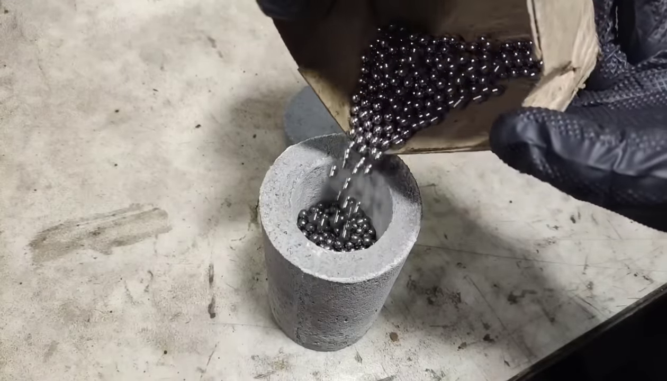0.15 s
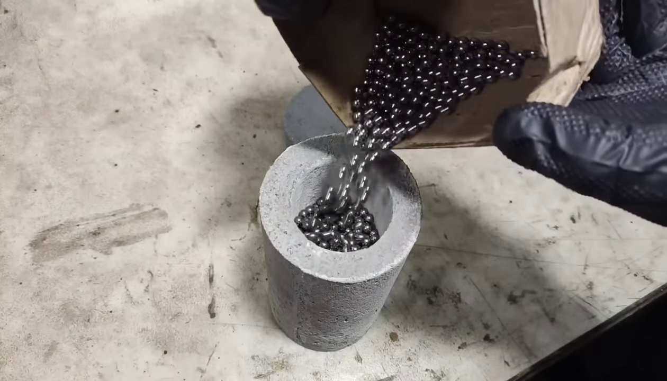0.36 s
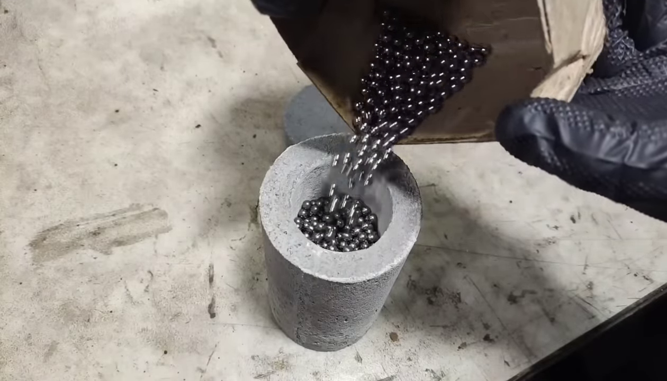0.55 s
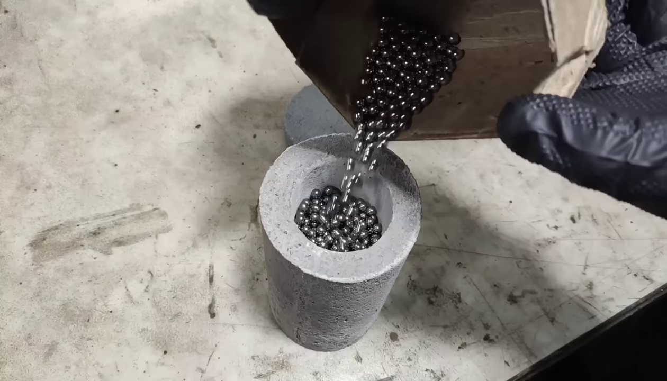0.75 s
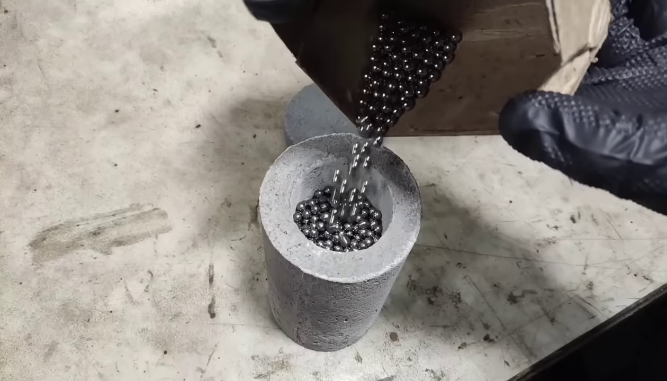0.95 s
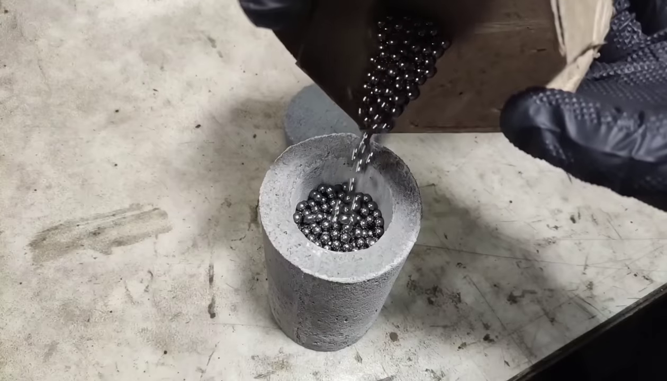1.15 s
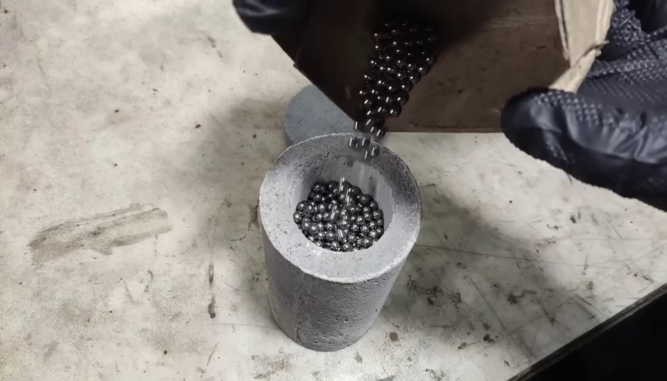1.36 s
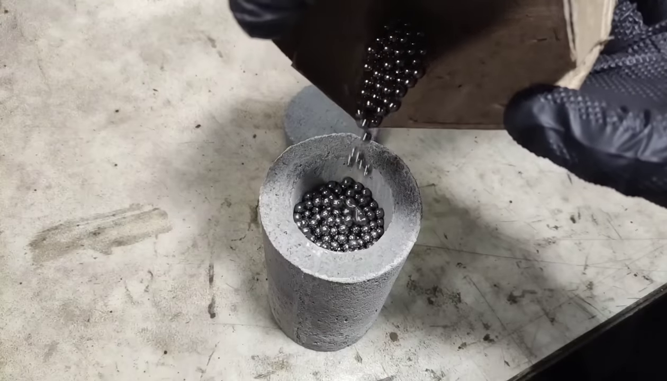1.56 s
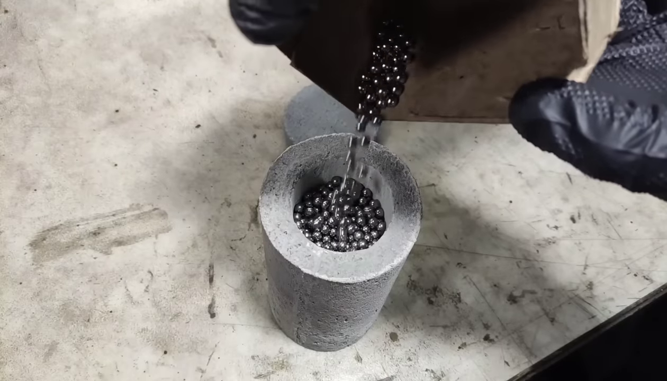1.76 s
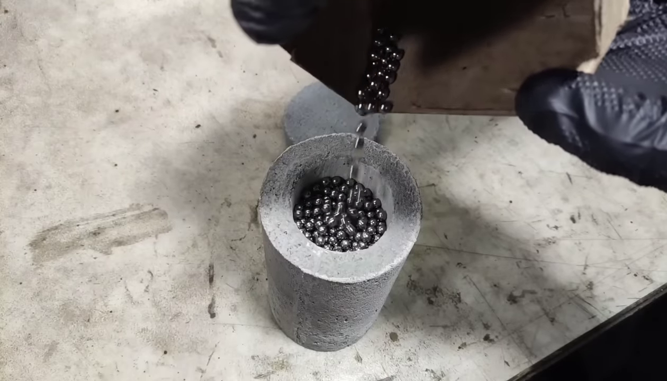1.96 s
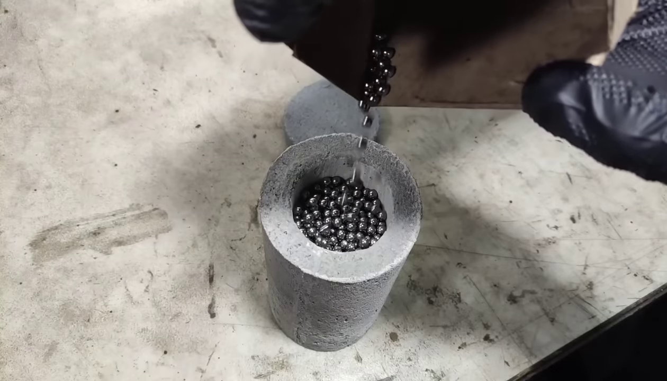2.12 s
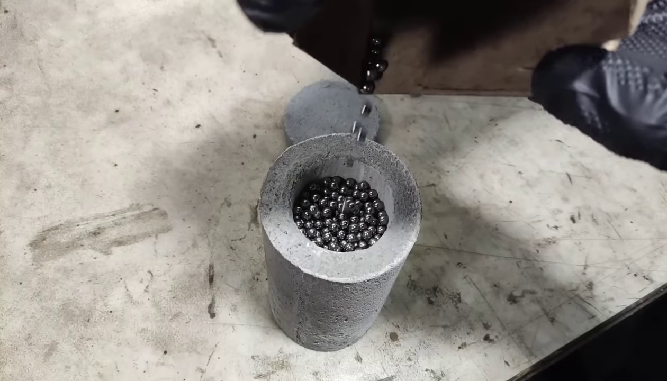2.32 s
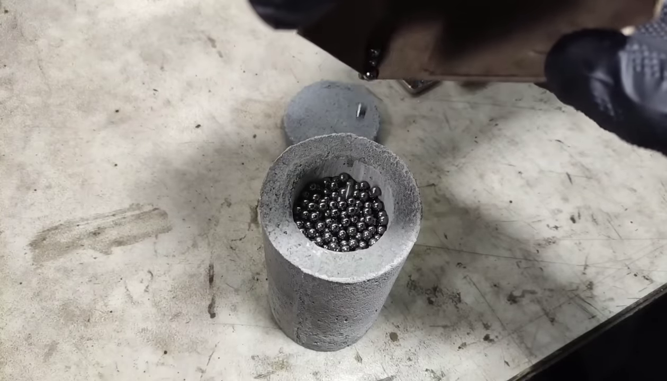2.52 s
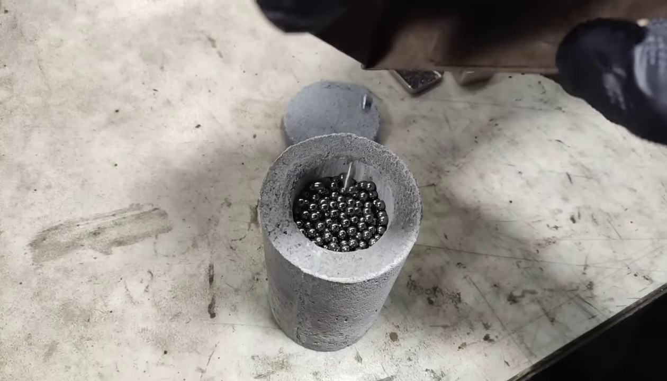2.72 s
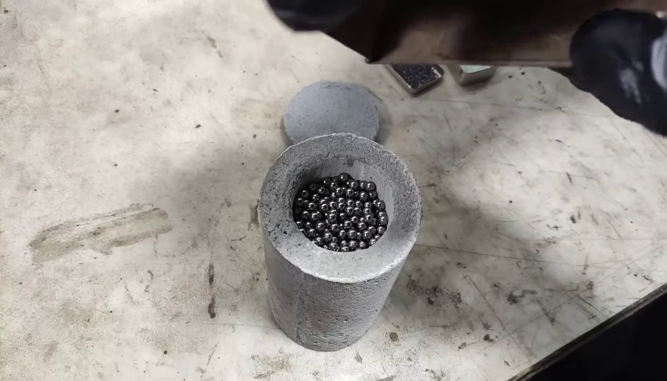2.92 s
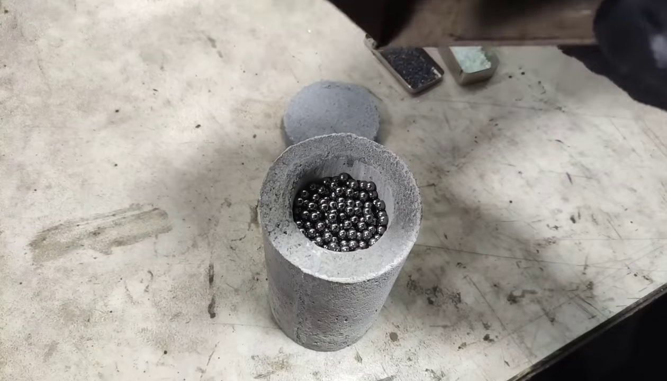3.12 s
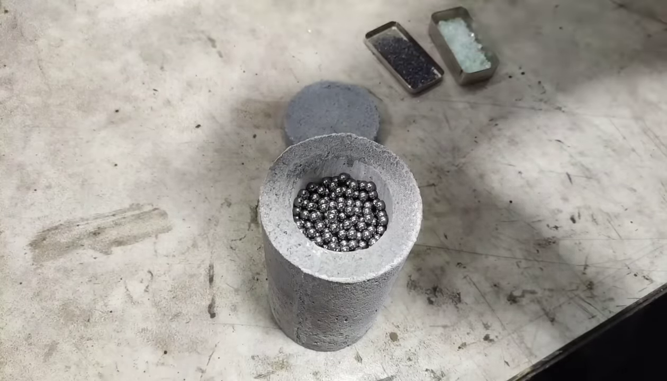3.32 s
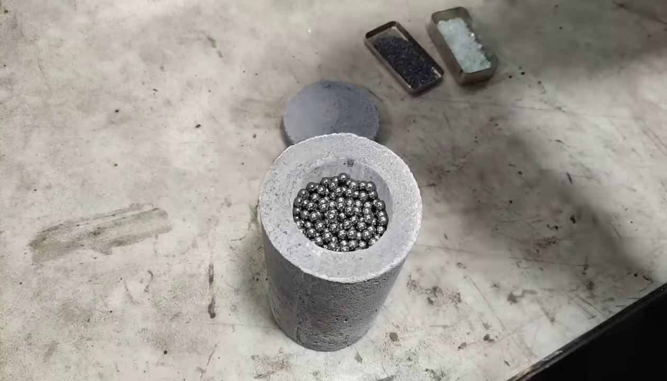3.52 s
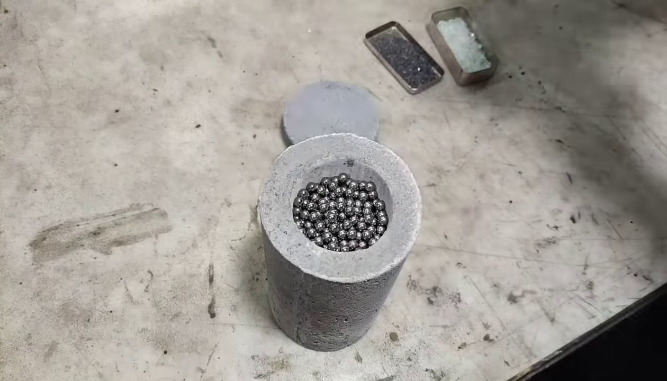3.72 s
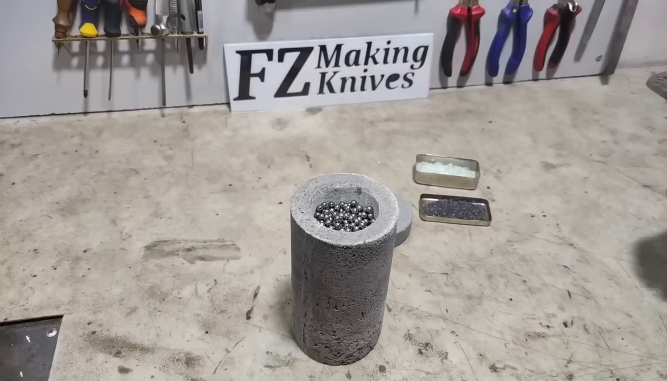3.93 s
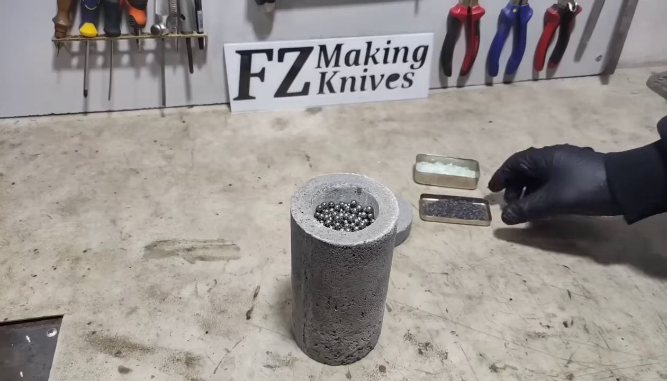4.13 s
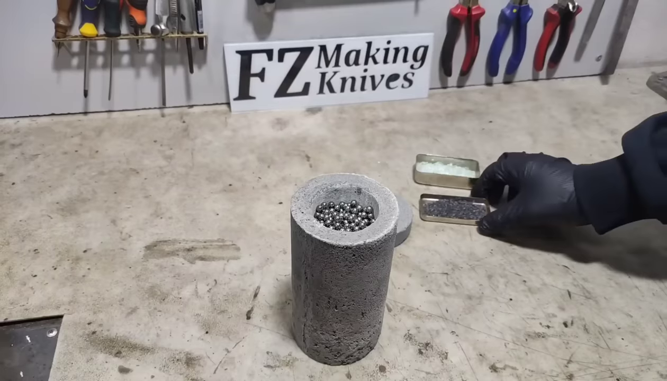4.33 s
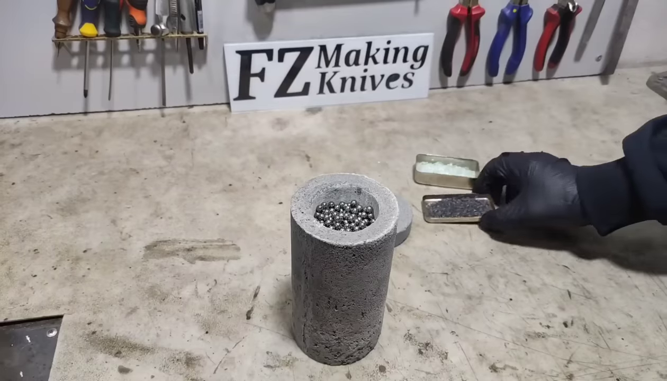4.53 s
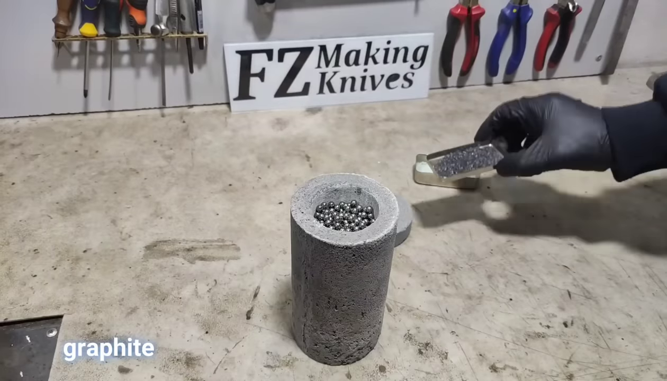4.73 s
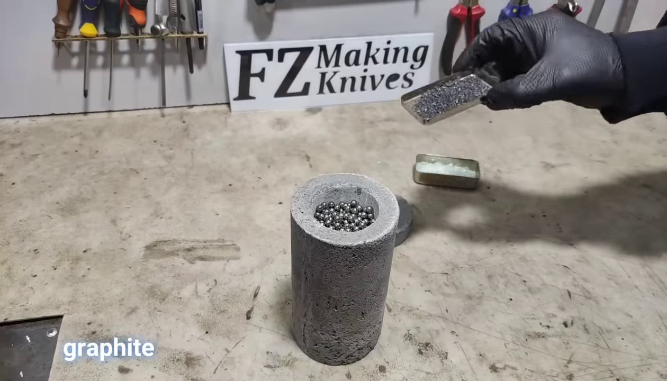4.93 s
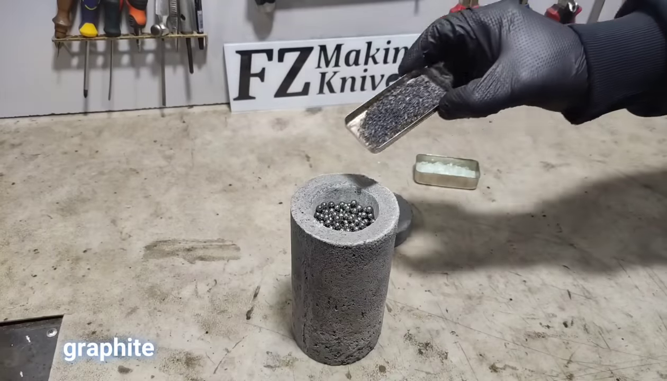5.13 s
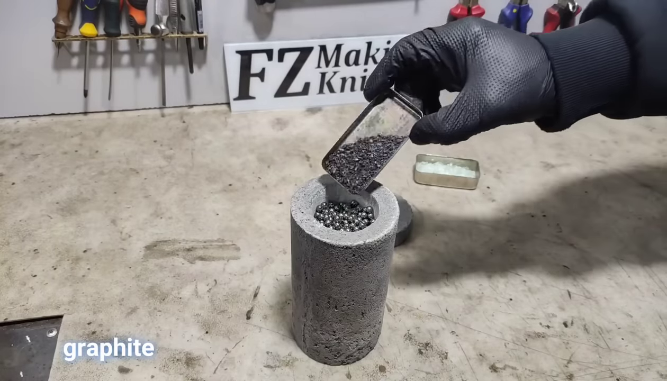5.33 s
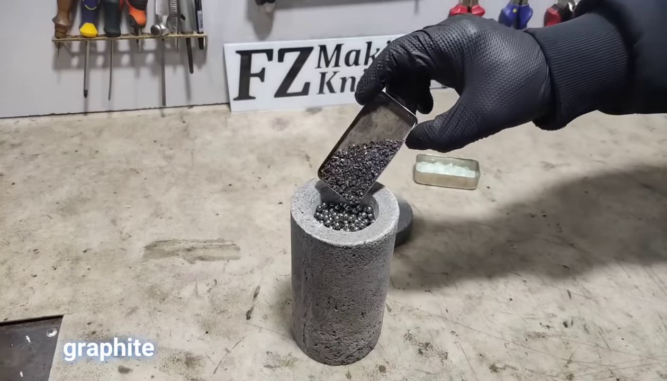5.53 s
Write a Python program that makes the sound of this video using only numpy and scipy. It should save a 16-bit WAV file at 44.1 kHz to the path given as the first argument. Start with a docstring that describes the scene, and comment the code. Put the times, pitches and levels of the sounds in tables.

```python
"""Small steel balls pour from a cardboard box into a thick crucible on a workbench, heard close up in stereo.
From the start, noise bursts through resonances click brightly on the heap; damped sines knock dully on the
box and the crucible, the bench booms and a small workshop echoes, over noisy rumble and hiss and a thin ring.
The dense stream thins to single balls, and the last one lands at three seconds. Then bands of soft noise rub
as the box is put away and a tin of graphite grains is lifted; a low sine swells and the grains hiss."""
import sys
import numpy as np
from scipy import signal
from scipy.fft import rfft, irfft, next_fast_len
from scipy.io import wavfile
from scipy.ndimage import uniform_filter1d

SR = 44100
rng = np.random.default_rng(int(sys.argv[2]) if len(sys.argv) > 2 else 0)


def file_out(sig):
    """Save sig as 16-bit WAV at sys.argv[1]."""
    # one column per channel
    cols = np.atleast_2d(sig).T
    # limit, then scale
    lim = np.clip(cols, -1, 1)
    pcm = np.round(lim * 32767).astype(np.int16)
    wavfile.write(sys.argv[1], SR, pcm)


N = 250047

# The tilt of the box sets the flow. Each row: time in seconds, flow in balls a second.
POUR_FLOW = [(0, 118.6), (.85, 137.5), (1.08, 81.7), (1.35, 61), (1.62, 42), (2.03, 58), (2.25, 15),
             (2.6, 6.93)]
# Balls that land hard or alone on the heap. Each row: landing in seconds, relative level in dB.
HARD_LANDINGS = [(0.0218, -26), (0.2902, -23), (0.3626, -23.5), (0.6624, -25.5), (1.2231, -27.5),
                 (1.264, -29.5), (1.3495, -30), (1.5224, -29.5), (1.5673, -31.5), (1.624, -27.5),
                 (1.719, -31.5), (1.8031, -30.5), (1.9888, -27.5), (2.1104, -29), (2.1233, -27.5),
                 (2.1524, -29), (2.1771, -29), (2.1993, -32), (2.2355, -35), (2.2765, -27.5),
                 (2.3013, -28.5), (2.3339, -31.5), (2.355, -32.5), (2.3826, -35.5), (2.4145, -33),
                 (2.4338, -29.5), (2.4542, -33), (2.481, -36), (2.4931, -35), (2.5317, -34), (2.585, -30),
                 (2.611, -30.5), (2.6845, -25.5), (2.7383, -32), (2.794, -34.5), (2.872, -32.5),
                 (2.9369, -31.5), (2.9553, -31.5), (3.0023, -32)]
FULL_FLOW = 147  # balls a second; a thinner stream stirs the heap less


def amp(db):
    """Turn decibels into gain."""
    return 10 ** (np.asarray(db) / 20)


def unit(x):
    """Scale to rms 1."""
    return x / np.sqrt(np.mean(x ** 2) + 1e-20)


def along(points, hz):
    """Read a curve of (Hz, value) points on a log frequency axis."""
    point_hz, values = np.transpose(points)
    return np.interp(np.log(hz + 1), np.log(point_hz + 1), values)


def flow_at(s):
    """Balls a second that pour at time s."""
    return np.interp(s, *np.transpose(POUR_FLOW))


def filtered(x, response):
    """Filter x with a complex response given as a function of frequency."""
    size = 2 * next_fast_len((N + SR // 2) // 2)  # half a second of room for ringing
    hz = np.fft.rfftfreq(size, 1 / SR)
    return irfft(rfft(x, size) * response(hz), size)[..., :N]


def causal(gain):
    """Give a gain curve the minimum phase, so that it rings only after a blow."""
    cepstrum = irfft(np.log(np.maximum(gain, 1e-6)))
    half = cepstrum.shape[-1] // 2
    cepstrum[..., 1:half] *= 2
    cepstrum[..., half + 1:] = 0
    return np.exp(rfft(cepstrum))


def resonance(hz, centre, width):
    """Power response of one damped mode, 1 at its centre."""
    damping = (hz * width) ** 2
    return damping / ((centre ** 2 - hz ** 2) ** 2 + damping)


def band(centre_hz, width_hz):
    """Stereo noise of rms 1 shaped by one resonance with steep skirts."""
    noise = rng.standard_normal((2, N))
    return unit(filtered(noise, lambda hz: resonance(hz, centre_hz, width_hz)))


def add(track, s, sound):
    """Mix a sound into a track at time s."""
    start = max(round(s * SR), 0)
    part = track[..., start:start + sound.shape[-1]]
    part += sound[..., :part.shape[-1]]


def air():
    """Steady noise: low rumble partly alike in both channels, under a faint hiss."""
    # The quiet workshop's spectrum. Each row: frequency in Hz, relative density in dB.
    air_spectrum = [(20, 6), (35, -11), (60, -3), (100, -11.5), (150, -14), (220, -15), (330, -20.5),
                    (550, -23.5), (1200, -28.5), (2500, -29), (5500, -32), (7500, -29.5), (9500, -34),
                    (15400, -33.5)]
    # Stereo likeness of the air. Each row: frequency in Hz, left-right correlation.
    air_likeness = [(60, 0.39), (180, 0.26), (550, 0.19), (1650, -0.075), (4970, 0.011), (15000, -0.01)]

    def mid_side(hz):
        turn = np.arccos(np.clip(along(air_likeness, hz), -1, 1)) / 2
        return amp(along(air_spectrum, hz)) * [np.cos(turn), np.sin(turn)]
    mid, side = filtered(rng.standard_normal((2, N)), mid_side)
    return amp(-59.0) * unit(np.array([mid + side, mid - side]))


def linger():
    """A thin metallic ring, one sine, holds under the clatter and fades after the last ball."""
    t = np.arange(N) / SR
    pitch_hz, held_db, fade_db_per_s = 894, -83, 6
    level_db = held_db - fade_db_per_s * np.maximum(t - HARD_LANDINGS[-1][0], 0)
    return amp(level_db) * np.sin(2 * np.pi * pitch_hz * t)


def contacts(per_ball, evenness, count=1600):
    """Times of collisions that follow the flow, each with a normal deviate for its size."""
    draws = rng.standard_normal((count, 3))
    even = np.clip(evenness, 0, 1)  # 0 = random gaps, 1 = equal gaps
    random_gaps = (draws[:, 0] ** 2 + draws[:, 1] ** 2) / 2  # exponential, mean 1
    due = np.cumsum(even + (1 - even) * random_gaps)
    t = np.linspace(0, POUR_FLOW[-1][0], SR)
    passed = np.cumsum(per_ball * flow_at(t)) * t[1]
    times = np.interp(due, passed, t, right=np.inf)  # collisions beyond the flow never sound
    return times, np.clip(draws[:, 2], -2, 2)


def stream(per_ball, start_db, fall_db_per_s, db_per_doubling, spread_db):
    """Rows (s, dB) of small random collisions that grow with the flow and weaken as the pour goes on."""
    s, size = contacts(per_ball, evenness=0)
    doublings = np.log2(flow_at(s) / FULL_FLOW)
    fall_db = fall_db_per_s * np.minimum(s, POUR_FLOW[-1][0])
    level_db = start_db + db_per_doubling * doublings - fall_db
    return np.transpose([s, level_db + spread_db * size])


def settling(rows, count=3):
    """Rows (s, dB) of the faint, weakening hops by which each hard ball finds its place."""
    flight_s, first_hop_db, loss_db_per_hop = 0.011, -14.5, 2  # typical flight; first hop relative to the blow
    flight, size = rng.standard_normal((len(rows), 2, count)).transpose(1, 0, 2)
    s = rows[:, :1] + np.cumsum(flight_s * np.exp(.5 * flight), axis=1)
    db = rows[:, 1:] + first_hop_db - loss_db_per_hop * np.arange(count) + 2 * size
    return np.transpose([s.ravel(), db.ravel()])


def landings():
    """Rows (s, dB of energy) of all steel blows: hard balls, their hops, the stream and its rattle."""
    trickle_s = 2.08  # from here on only the hard or single balls land
    clear_s = .012  # no ball of the stream lands this close to a hard one
    hard = np.array(HARD_LANDINGS)
    s, size = contacts(1, evenness=.72, count=260)  # the balls queue at the lip of the box
    clear = np.abs(s[:, None] - hard[:, 0]).min(axis=1) > clear_s
    free = (s < trickle_s) & clear
    # All fall from the same height; in a full stream they jostle and land unevenly.
    crowding = flow_at(s) / FULL_FLOW
    falling = np.transpose([np.where(free, s, np.inf), -32.5 + 4.5 * crowding * size])
    # The heap rattles less as the box empties and the heap deepens.
    rattle = stream(6.5, start_db=-23.5, fall_db_per_s=1, db_per_doubling=1.0, spread_db=3.0)
    blows = np.vstack([hard, settling(hard), falling])
    return np.vstack([blows + [0, 15.5], rattle])  # 15.5 dB turns blow level into burst energy


def rebounds(rows, spread, tail_db, tail_t60, tail_top_hz, size=2048):
    """Each blow runs through the neighbouring balls as a noisy burst of tiny rebounds with its own colour."""
    t, hz = np.arange(size) / SR, np.fft.rfftfreq(size, 1 / SR)
    life = spread * np.exp(.15 * rng.standard_normal((len(rows), 1, 1)))  # seconds
    swell = (t / life * np.exp(1 - t / life)) ** np.sqrt(2)  # a quick rise and fall
    tail = amp(tail_db - 60 * t / tail_t60) * (1 - np.exp(-t / life))
    noise = rng.standard_normal((len(rows), 2, size))
    dull_tail = rfft(noise * tail) / np.sqrt(1 + (hz / tail_top_hz) ** 8)  # the tail has less top
    spectra = rfft(noise * swell) + dull_tail
    colour_db = 2.2 * signal.resample(rng.standard_normal((len(rows), 16)), len(hz), axis=1)
    bursts = irfft(spectra * amp(colour_db)[:, None])
    track = np.zeros((2, N))
    for (s, db), burst in zip(rows, bursts):
        if np.isfinite(s):
            add(track, s, amp(db) * unit(burst) / np.sqrt(size))
    return track


def clicks(rows):
    """Steel strikes steel: a noisy crack rings briefly in bright resonances that differ between left and right."""
    # Resonances of the clatter. Each row: centre in Hz, width in Hz, relative left and right levels in dB.
    clatter_modes = [(2830, 210, 9, 10), (3755, 350, 5.5, 2), (4260, 110, -1, 5.5), (5100, 90, 5, -19),
                     (6674, 163, 15.5, 16), (7000, 450, 7.5, 7), (7510, 130, 18, 10), (7950, 266, 12.5, -2)]
    # The bare steel-on-steel crack. Each row: frequency in Hz, relative level in dB.
    crack_spectrum = [(60, -12.5), (220, -6.5), (450, 2), (900, 0.5), (1300, -6), (2200, -2), (3300, 0.5),
                      (6000, 2), (8500, -0.5), (11000, 1.5), (12200, -1.5), (15000, 1.5)]

    def ring(hz):
        modes = sum(amp([[left], [right]]) ** 2 * resonance(hz, centre, width)
                    for centre, width, left, right in clatter_modes)
        crack = amp(along(crack_spectrum, hz)) ** 2
        return causal(unit(np.sqrt(crack + modes)))
    bursts = rebounds(rows, spread=.002, tail_db=-12.5, tail_t60=.065, tail_top_hz=9500)
    return filtered(bursts, ring)


def thud(pitch_hz, t60):
    """A heavily damped swing: a sine that dies within a few cycles."""
    t = np.arange(SR // 20) / SR
    return np.sin(2 * np.pi * pitch_hz * t) * amp(-60 * t / t60)


def knocks():
    """The weight of the balls thumps the box and the crucible, whose low modes ring briefly."""
    # The loudest dull knocks. Each row: start in seconds, level in dB before the gains below,
    # pitch in Hz, hard rap relative to the knock in dB before its own gain.
    loud_knocks = [(0.022, -24.5, 760, -14), (0.254, -27.5, 724, -17), (0.275, -20, 740, -26),
                   (0.28, -28, 730, -22), (0.295, -31, 850, -20), (0.313, -24, 627, -32),
                   (0.346, -28, 600, -23), (0.665, -36, 950, 0), (0.775, -40, 790, -16),
                   (0.916, -37.5, 870, -16), (1.157, -30.5, 810, -19), (1.222, -31.5, 820, -16),
                   (1.248, -34, 850.5, -11), (1.359, -34.5, 620, -0.5), (1.398, -36, 850, 1),
                   (1.444, -28, 765, -28), (1.619, -36, 875, -8), (1.717, -36, 740, -6.5),
                   (1.812, -37, 610, -6), (2.039, -32.5, 727, -21), (2.789, -37, 520, -9.5)]
    # Modes of the crucible and the box. Each row: centre in Hz, width in Hz, gain in dB.
    body_modes = [(383, 19, -12), (538, 49, -1), (624, 26, 2.5), (750, 46, 0), (883, 55, 5), (1054, 36, 5),
                  (1440, 120, 5), (1890, 59, 11.5)]
    # How the walls pass a knock between the modes. Each row: frequency in Hz, gain in dB.
    wall_gain = [(40, -3), (280, -15), (550, -3), (950, -1.5), (1300, -2.5), (2200, 2.5), (4000, 7),
                 (9000, -34)]
    push = np.zeros(N)
    bumps = stream(4.5, start_db=-24.5, fall_db_per_s=3.5, db_per_doubling=0.5, spread_db=3.0)
    for (s, db), (detune, hardness) in zip(bumps, rng.standard_normal((len(bumps), 2))):
        if np.isfinite(s):
            low_thud = thud(pitch_hz=750 * np.exp(0.22 * detune), t60=0.011)
            high_thud = thud(pitch_hz=1700 * np.exp(0.17 * detune), t60=0.0035)
            add(push, s, amp(db - 14.0) * low_thud)
            add(push, s, amp(db - 21.5 + 4.2 * hardness) * high_thud)
    for s, db in HARD_LANDINGS:
        add(push, s, amp(db - 16) * thud(pitch_hz=420, t60=0.0061))  # a hard ball's weight
    for s, db, pitch_hz, rap_db in loud_knocks:
        add(push, s, amp(db + 3.5) * thud(pitch_hz, t60=.012))
        add(push, s, amp(db + rap_db + 13.0) * thud(pitch_hz=1470, t60=0.0016))  # a hard blow also raps

    def ring(hz):
        modes = sum(amp(db) ** 2 * resonance(hz, centre, width) for centre, width, db in body_modes)
        return causal(np.sqrt(amp(along(wall_gain, hz)) ** 2 + modes))
    return filtered(push, ring)


def bench(rows):
    """Every landing pushes the bench top, whose low modes boom in mono."""
    # Modes of the bench top under the crucible. Each row: centre in Hz, width in Hz, gain in dB.
    bench_modes = [(108, 22, 1), (131.7, 18, -2), (224, 55, -4.5), (373, 48, -0.5), (464, 22, -3.5)]
    pushes = np.zeros(N)
    for s, db in rows[np.isfinite(rows[:, 0])]:
        add(pushes, s, amp([0.61 * db - 1.5]))  # the push grows more slowly than the crack

    def boards(hz):
        modes = sum(amp(db) ** 2 * resonance(hz, centre, width) for centre, width, db in bench_modes)
        return causal(np.sqrt(modes) / (1 + (hz / 700) ** 4))
    return filtered(pushes, boards)


def workshop(x, alike):
    """Diffuse echo; its fine pattern keeps changing, as each overlapping piece gets a fresh random tail."""
    # The workshop's decay. Each row: frequency in Hz, time to fall 60 dB in seconds.
    room_decay = [(150, 0.5), (800, 0.37), (3000, 0.19), (7500, 0.043), (15000, 0.15)]
    wet = np.zeros((2, N))
    hop = SR // 12
    padded = np.pad(x, (hop, 2 * hop))
    fade = np.sin(np.pi * np.arange(2 * hop) / (2 * hop))
    for start in range(0, N + hop, hop):
        own, shared = rng.standard_normal((2, SR // 2)), rng.standard_normal(SR // 2)
        hz, t, z = signal.stft(own + alike * shared, SR, nperseg=256)
        decay = amp(-60 * t / along(room_decay, hz)[:, None])
        tail = signal.istft(z * decay, SR, nperseg=256)[1]
        tail = tail * (1 - np.exp(-np.arange(tail.shape[1]) / SR / 0.00043))  # the echo builds up quickly
        piece = padded[start:start + 2 * hop] * fade
        echo = signal.fftconvolve(piece[None], tail / np.linalg.norm(tail[0]), axes=1)
        add(wet, (start - hop) / SR, echo[:, max(hop - start, 0):])
    return wet


def handling():
    """Gloves rub on cardboard and tin as swells of band noise; grainy noise hisses as the tin tilts."""
    # Soft rubs on the box and the tin. Each row: middle in seconds, length in seconds,
    # centre in Hz, width in Hz, level at the middle in dB.
    soft_rubs = [(3.38, 0.21, 433, 248, -74), (3.583, 0.058, 790, 450, -69.5), (3.74, 0.36, 885, 350, -78),
                 (4.73, 0.065, 1390, 2200, -72)]
    t = np.arange(N) / SR
    rubs = sum(amp(db) * np.exp(-2 * ((t - s) / length) ** 2) * band(centre, width)
               for s, length, centre, width, db in soft_rubs)
    slide_s, slide_length_s = 5.44, 0.12  # middle and length of the graphite's slide
    grains = unit(uniform_filter1d(rng.exponential(size=N) ** 2, size=60))
    hiss = band(centre_hz=6400, width_hz=3700) + amp(-3) * band(centre_hz=7800, width_hz=600)
    slide = amp(-73) / (1 + (2 * (t - slide_s) / slide_length_s) ** 8)
    return rubs + slide * grains * hiss


def hum():
    """A low sine that wavers a little in pitch and swells near the end."""
    # The hum's swell. Each row: time in seconds, rms level in dB.
    hum_levels = [(4.4, -110), (4.9, -78), (5.25, -75.5), (5.45, -66.5), (5.58, -72), (5.67, -77)]
    waver_hz = 83 + 2 * signal.resample(rng.standard_normal(40), 1000)
    pitch_hz = np.interp(np.arange(N), np.linspace(0, N, len(waver_hz)), waver_hz)
    phase = 2 * np.pi * np.cumsum(pitch_hz) / SR
    level_db = np.interp(np.arange(N) / SR, *np.transpose(hum_levels))
    return amp(level_db) * np.sqrt(2) * np.sin(phase)


def scene():
    """Clicks, knocks and the bench's boom, near and in the room, over ring, handling, hum and air."""
    # Stereo tilt of the pour. Each row: frequency in Hz, left minus right in dB.
    stereo_tilt = [(100, 0.2), (600, 1), (1100, 1), (2000, 1), (4000, -2), (6000, -2), (8500, 5),
                   (10500, -1), (15000, -3.5)]
    rows = landings()
    bright, dull = clicks(rows), knocks()
    bright_echo = amp(-5.0) * workshop(bright.sum(0) / np.sqrt(2), alike=0.22)
    dull_echo = amp(-11.0) * workshop(dull, alike=1.33)
    pour = bright + dull + bench(rows) + bright_echo + dull_echo
    balls = filtered(pour, lambda hz: amp(along(stereo_tilt, hz) * np.array([[.5], [-.5]])))
    return balls + linger() + handling() + hum() + air()


def record(dry):
    """A very steep low-pass removes what lies above the band limit."""
    top_hz = 15650
    return filtered(dry, lambda hz: 1 / np.sqrt(1 + (hz / top_hz) ** 200))


dry = scene()
out = record(dry)
file_out(out)
```